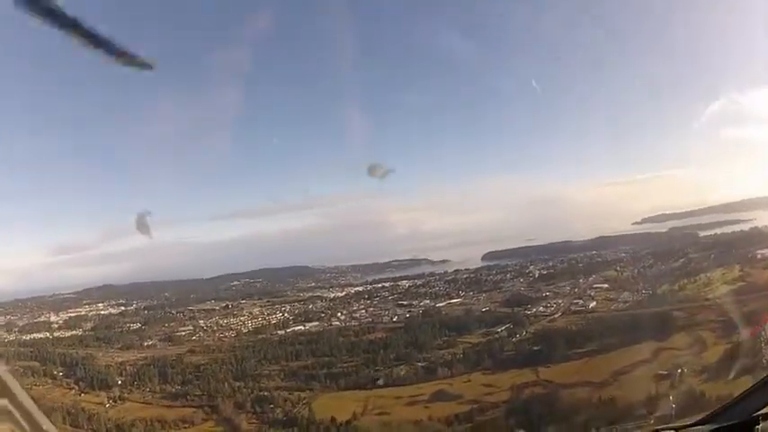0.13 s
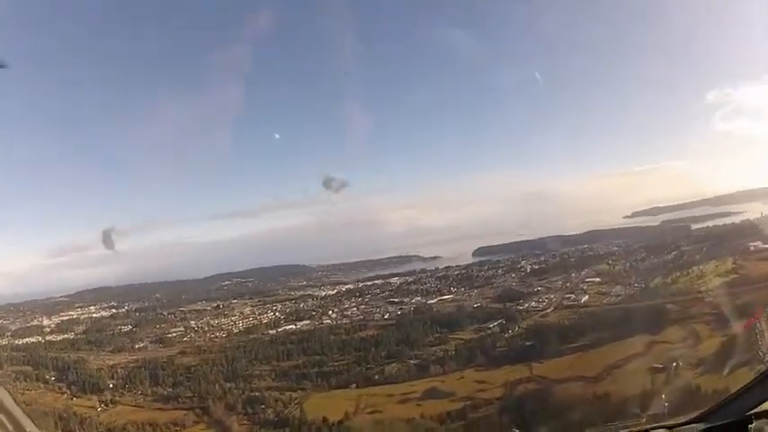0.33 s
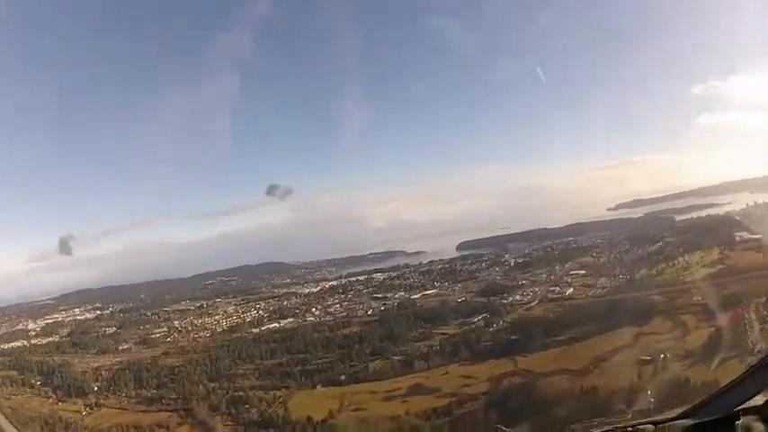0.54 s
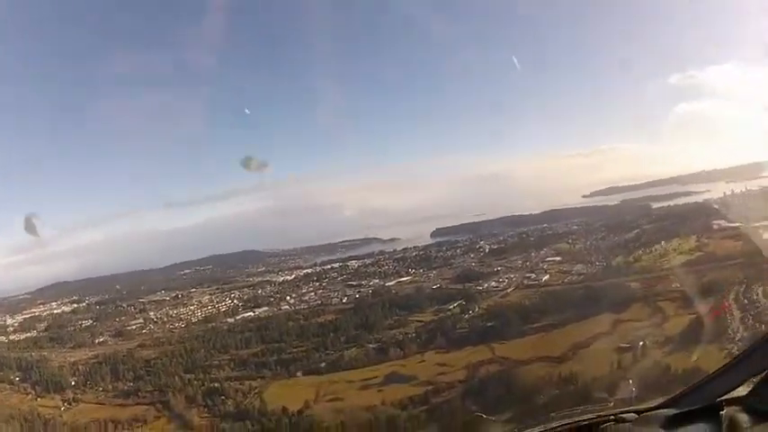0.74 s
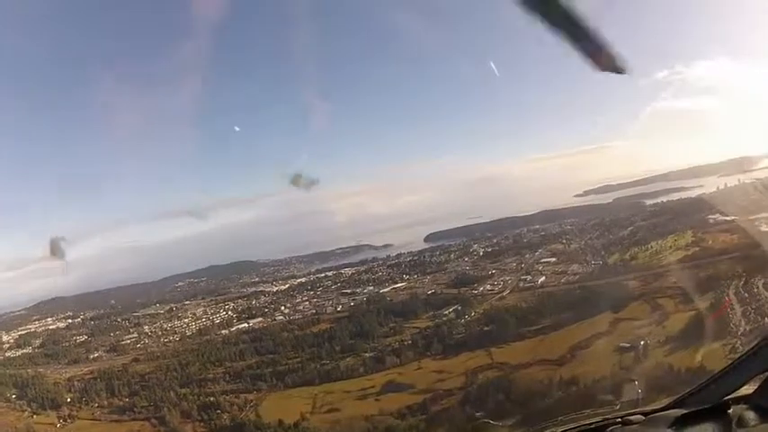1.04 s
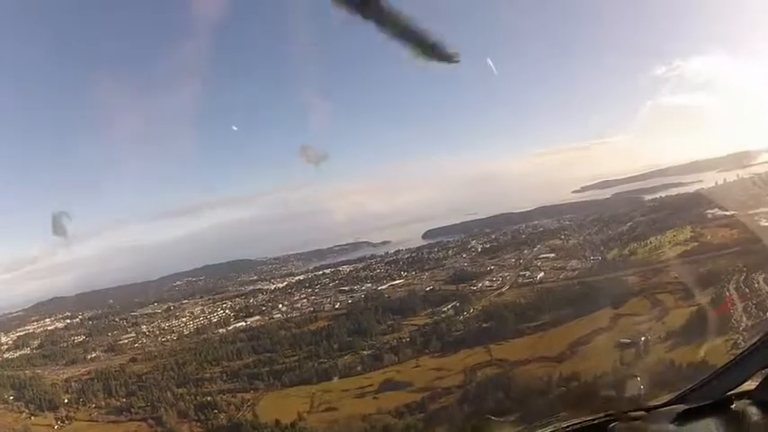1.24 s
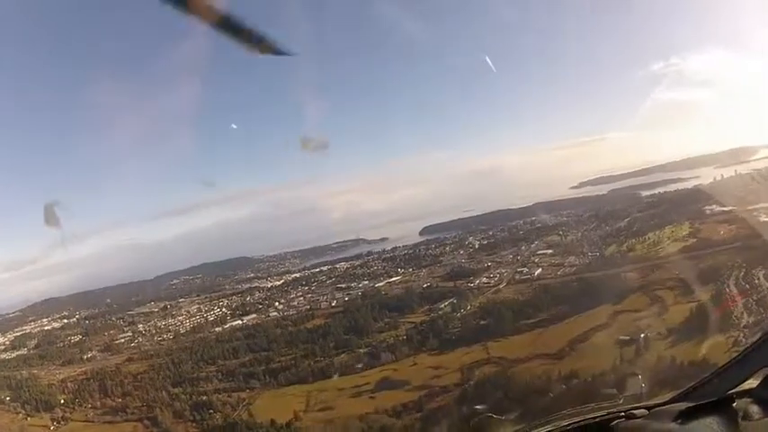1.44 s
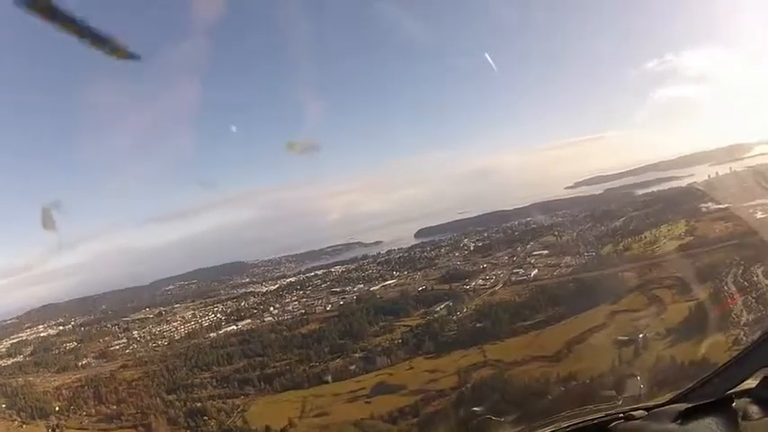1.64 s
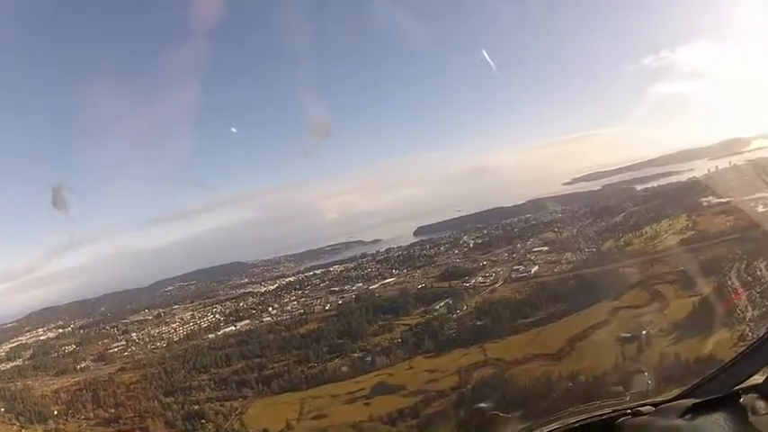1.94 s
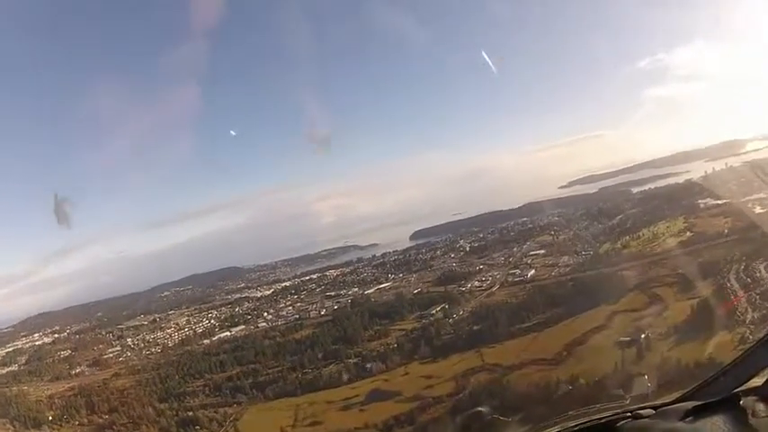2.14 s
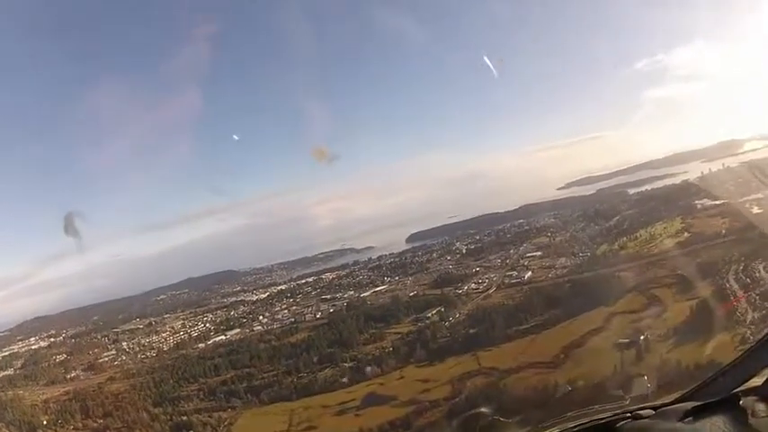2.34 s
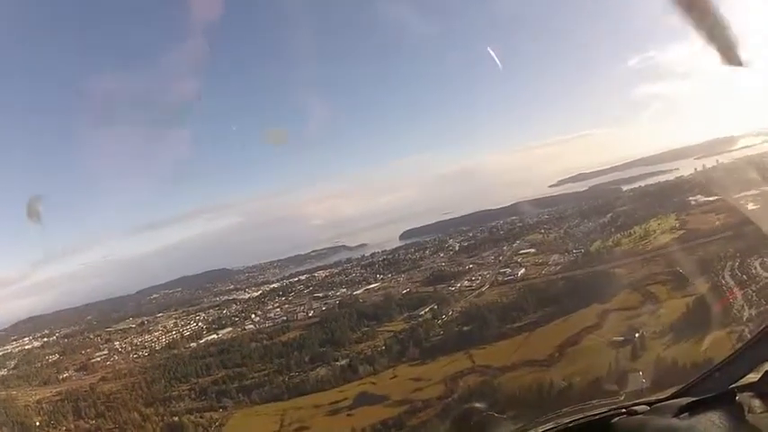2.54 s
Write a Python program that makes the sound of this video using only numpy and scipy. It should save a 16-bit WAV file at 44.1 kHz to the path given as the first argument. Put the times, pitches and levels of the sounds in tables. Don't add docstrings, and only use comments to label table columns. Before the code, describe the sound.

Constant helicopter drone from start to end, low hum with fast blade throb, steady gear tones wavering slightly, soft air hiss and a faint seal whistle, captured close inside the cabin by a small housed microphone.

```python
import sys
import numpy as np
from scipy import signal
from scipy.fft import rfft, irfft
from scipy.io import wavfile
from scipy.ndimage import uniform_filter1d

SR = 44100
rng = np.random.default_rng(int(sys.argv[2]) if len(sys.argv) > 2 else 0)


def voltage_ratio(level):
    return 10 ** (np.asarray(level, float) / 20)


def store_wav(level_fs):
    pcm = np.round(np.clip(np.atleast_2d(level_fs), -1, 1) * 32767)
    wavfile.write(sys.argv[1], SR, pcm.T.astype(np.int16))


N = 119070
HOLD_HZ = 12000
BLADES, TAIL_RATIO, SHAFT_RATIO, MESH_RATIO = 3.001, 5.302, 15.549, 100


def read(points, at, log=False):
    x, *columns = np.transpose(points)
    if log:
        x, at = np.log(x + 1), np.log(at + 1)
    return np.array([np.interp(at, x, column) for column in columns])


def evened(x):
    return x / np.sqrt(np.mean(x ** 2))


def wander(hz, count):
    curve_hz = np.fft.rfftfreq(4096, 1 / 1000)
    spectrum = rfft(rng.standard_normal((count, 4096))) / (1 + (curve_hz / hz) ** 2)
    slow = irfft(spectrum)
    slow /= slow.std(1, keepdims=True)
    return np.array([np.interp(np.arange(N) / SR, np.arange(4096) / 1000, curve) for curve in slow])


def tones(turns, level_db):
    waver_hz, waver_db, jitter_rad = 8, .6, .08
    count = len(turns)
    phase = 2 * np.pi * (turns + rng.random((count, 1))) + jitter_rad * wander(waver_hz, count)
    level = voltage_ratio(level_db + waver_db * wander(waver_hz, count))
    return np.sqrt(2) * (level * np.cos(phase)).sum(0)


# start_s, rotor_turns_per_s
ROTOR_SPEED = [(0, 6.437), (.5, 6.437), (.81, 6.4408), (1.08, 6.4465), (1.62, 6.4582), (2.16, 6.468),
               (2.7, 6.4787)]


def rotor_turns():
    return np.cumsum(read(ROTOR_SPEED, np.arange(N) / SR)[0]) / SR


def noise(colour_db, patch_db, flicker_db, throb_db):
    frames = N // 128 + 9
    real, imag, patches = rng.standard_normal((frames, 257, 3)).T
    patches = evened(uniform_filter1d(uniform_filter1d(patches, 8, 0), 16, 1))
    flicker = evened(uniform_filter1d(rng.standard_normal(frames), 5))
    spectra = (real + 1j * imag) * voltage_ratio(patch_db * patches + flicker_db * flicker)
    white = signal.istft(spectra, nperseg=512, noverlap=384)[1][:N]
    white *= voltage_ratio(throb_db * np.cos(2 * np.pi * BLADES * rotor_turns()))
    colour = voltage_ratio(colour_db(np.fft.rfftfreq(N, 1 / SR)))
    return evened(irfft(rfft(white) * colour, N))


# freq_hz, density_db_per_hz
BUFFET = [(8, -30), (30, -9), (60, -7.5), (100, -1.5), (150, -5), (400, -10), (700, -21.5), (930, -32.5),
          (2000, -60.5)]


def buffeting():
    def colour_db(hz):
        return read(BUFFET, hz, log=True)[0] - 80 * (hz > HOLD_HZ / 2)
    return voltage_ratio(-36.5) * noise(colour_db, patch_db=0.0, flicker_db=0.56, throb_db=0.1)


# freq_hz, density_db_per_hz
RUSH = [(500, -13), (950, -13.5), (1300, -6.5), (3400, -5.5), (4000, -11), (5000, -15), (5700, -16),
        (6000, -30)]
# freq_hz, width_hz, lift_db
CAVITY = [(1043, 63, 4.5), (1370, 263, 9.5), (1650, 69, 2), (2105, 360, 7.5), (2650, 260, 4.5),
          (3000, 340, 4), (3215, 83, 6), (3464, 70, 5.5), (3700, 100, 3), (3870, 70, 4.5), (4230, 200, 2),
          (5110, 46, 7.5), (5330, 120, 4.5),
          (600, 60, 11), (1223, 77, -0.5), (1605, 70, -1), (2490, 68, -2), (2865, 60, -7), (3830, 67, -3.5)]


def air_rush():
    def colour_db(hz):
        lift_db = sum(db / (1 + (2 * (hz - freq_hz) / width_hz) ** 2)
                      for freq_hz, width_hz, db in CAVITY)
        return read(RUSH, hz, log=True)[0] + lift_db - 80 * (hz > HOLD_HZ / 2)
    return voltage_ratio(-42) * noise(colour_db, patch_db=.8, flicker_db=.3, throb_db=.1)


# start_s, pitch_hz, level_db
WHISTLE = [(0, 1108, -62), (.4, 1097, -62), (.75, 1083, -58), (1.0, 1076, -59), (1.25, 1059, -52),
           (1.45, 1060, -54), (1.7, 1079, -61), (2.0, 1077, -62), (2.7, 1093, -62.5)]


def seal_whistle():
    pitch_hz, level_db = read(WHISTLE, np.arange(N) / SR)
    return tones(np.cumsum(pitch_hz)[None] / SR, level_db[None])


BLADE_ORDERS = [1, 2, 3, 4, 6, 10, 12, 14]
BLADE_DB = [-55.5, -47.5, -43.5, -48, -49, -51, -53, -59]
TAIL_ORDERS = [1, 2, 6, 10]
TAIL_DB = [-54, -46.5, -53, -61]
SHAFT_ORDERS = [1, 2, 3, 8, 12, 14, 15, 16, 34, 51]
SHAFT_DB = [-46, -54, -59, -75, -65, -65, -54, -68, -65, -77]
MESH_ORDERS = [1, 3, 4, 5, 7, 8]
MESH_DB = [-63, -55.5, -62, -68, -74, -70]
OTHER_RATIOS = [22, 25, 121.31, 202.11, 203.65, 258.3, 261.3, 605.02]
OTHER_DB = [-55, -55, -66, -63, -54.5, -67, -62, -70]


def steady_drivetrain():
    parts = [(BLADES, BLADE_ORDERS, BLADE_DB),
             (TAIL_RATIO, TAIL_ORDERS, TAIL_DB),
             (SHAFT_RATIO, SHAFT_ORDERS, SHAFT_DB),
             (MESH_RATIO, MESH_ORDERS, MESH_DB),
             (1, OTHER_RATIOS, OTHER_DB)]
    turns = rotor_turns()
    return sum(tones(np.outer(orders, ratio * turns), np.array(level_db)[:, None])
               for ratio, orders, level_db in parts)


SWELLING_RATIOS = [17 * SHAFT_RATIO, 6 * MESH_RATIO, 108.33, 4 * TAIL_RATIO, 5 * BLADES]
# start_s, pinion_db, planet_db, pump_db, tail_drive_db, fifth_blade_order_db
PART_LEVELS = [(0, -53, -53, -53, -34.5, -41), (.25, -53.5, -55, -68, -37.5, -40),
               (.45, -45.5, -55, -57.5, -37, -40), (.72, -45, -58.5, -59.5, -33.5, -44),
               (.95, -44.5, -57, -57, -36, -50), (1.15, -50.5, -58, -58, -35, -49),
               (1.45, -52, -51, -54, -33.5, -44), (1.8, -52.5, -52, -55, -36, -43),
               (1.98, -49, -54, -51, -36.5, -34.5), (2.2, -48.5, -53.5, -53, -32, -40),
               (2.4, -51, -53, -54.5, -33.5, -48), (2.55, -45, -51, -53, -37.5, -43),
               (2.7, -43.5, -50.5, -51, -34.5, -49)]


def swelling_parts():
    stroke_hz, peak_s, swell_db = 3.4, 1.9, 4
    t = np.arange(N) / SR
    level_db = read(PART_LEVELS, t)
    level_db[2] += swell_db * (np.cos(2 * np.pi * stroke_hz * (t - peak_s)) - .2)
    return tones(np.outer(SWELLING_RATIOS, rotor_turns()), level_db)


def sun_gear():
    level_db, swell, swing_rad = -47.5, .16, .45
    angle = 2 * np.pi * rotor_turns()
    mesh_turns = (2 * MESH_RATIO * angle + swing_rad * np.sin(angle)) / (2 * np.pi)
    return (1 + swell * np.cos(angle)) * tones(mesh_turns[None], level_db)


def scene():
    air = buffeting() + air_rush() + seal_whistle()
    return (air + steady_drivetrain() + swelling_parts() + sun_gear())[None]


def sample_hold(dry):
    held = np.repeat(signal.resample(dry, N * HOLD_HZ // SR, axis=1), 4, axis=1)
    return signal.resample(held, N, axis=1)


# start_s, length_s
TOP_OPEN = [(0, .012), (.135, .02), (.6, .05), (1.09, .07), (1.305, .02), (1.45, .03), (1.6, .025),
            (1.775, .02), (1.97, .03), (2.14, .02), (2.435, .025), (2.69, .01)]


def band_limit(spectrum):
    edge_hz, top_hz, top_db = 15280, 15720, -11
    hz, t = np.fft.rfftfreq(N, 1 / SR), np.arange(N) / SR
    below = voltage_ratio(-60 * np.clip((hz - edge_hz) / 150 + .3, 0, 1) ** 2)
    gate = sum(1. * (t > start_s) * (t < start_s + length_s) for start_s, length_s in TOP_OPEN)
    top = uniform_filter1d(gate, 500) * irfft(spectrum * (1 - below) * (hz < top_hz), N)
    return irfft(spectrum * below, N) + voltage_ratio(top_db) * top


def low_pass(x):
    return signal.sosfilt(signal.butter(12, 15850, fs=SR, output="sos"), x)


def record(dry):
    hiss_db, treble_db_per_khz = -66, -0.0153
    hz = np.fft.rfftfreq(N, 1 / SR)
    tilted = rfft(sample_hold(dry)) * voltage_ratio(treble_db_per_khz * hz / 1000)
    hiss = rfft(voltage_ratio(hiss_db) * rng.standard_normal(N))
    mix = band_limit(tilted + hiss)
    return low_pass(mix)


dry = scene()
out = record(dry)
store_wav(out)
```